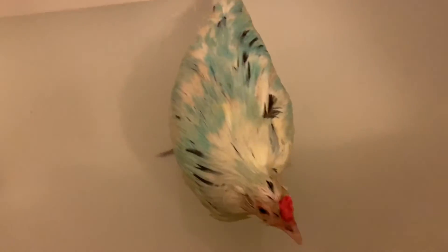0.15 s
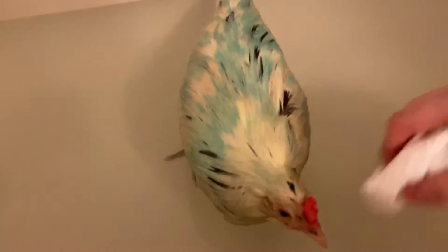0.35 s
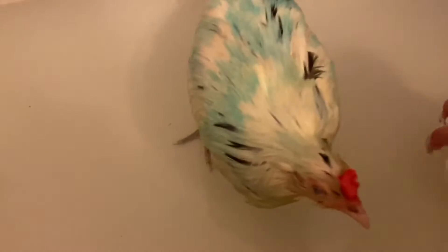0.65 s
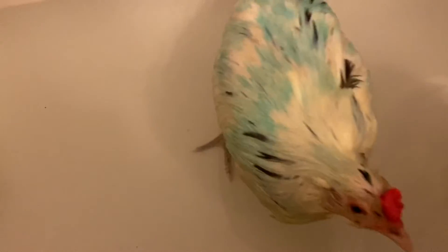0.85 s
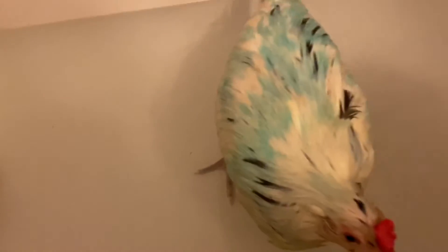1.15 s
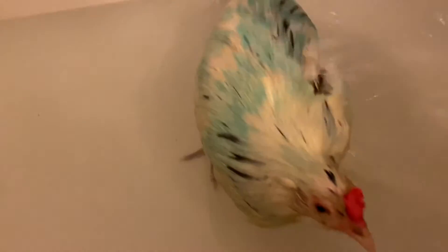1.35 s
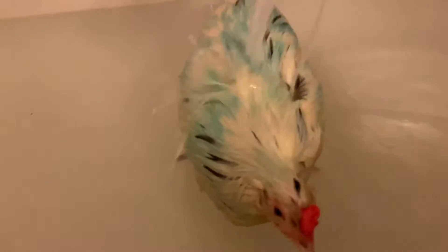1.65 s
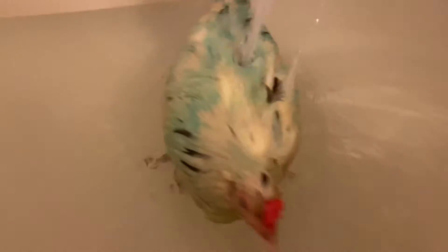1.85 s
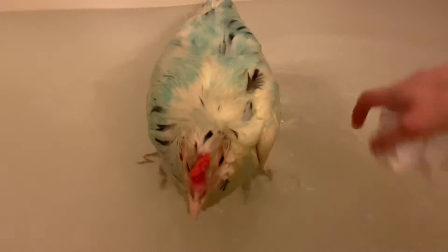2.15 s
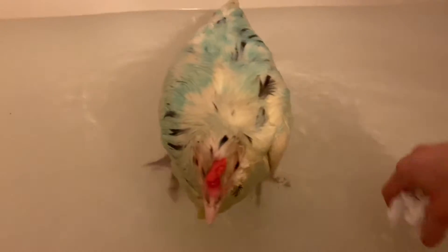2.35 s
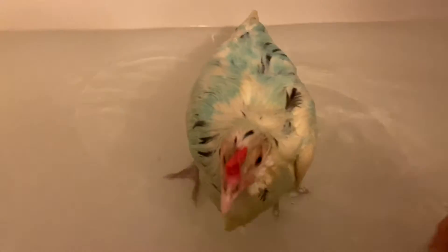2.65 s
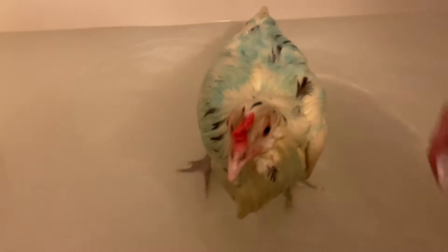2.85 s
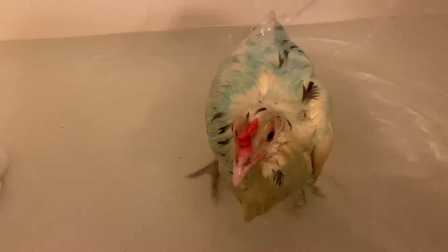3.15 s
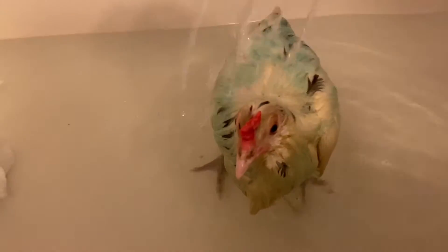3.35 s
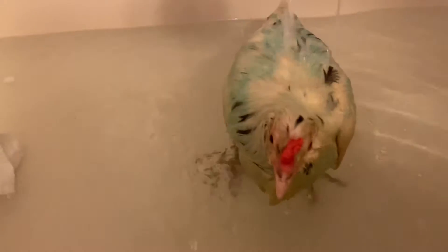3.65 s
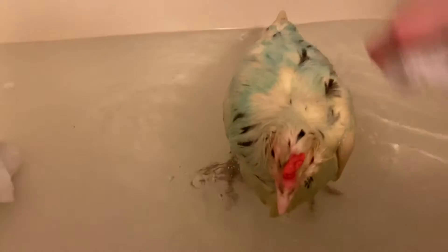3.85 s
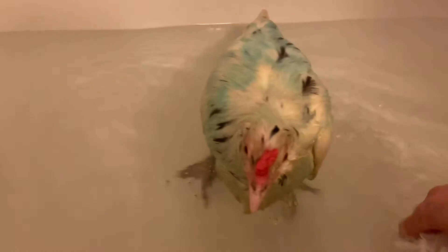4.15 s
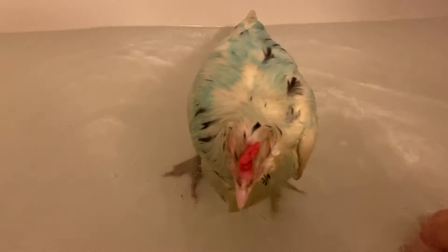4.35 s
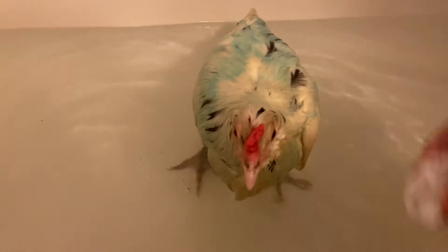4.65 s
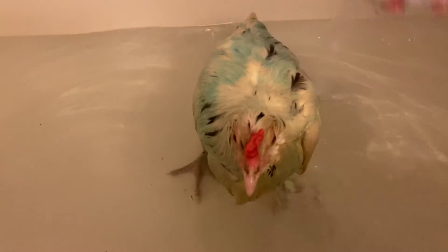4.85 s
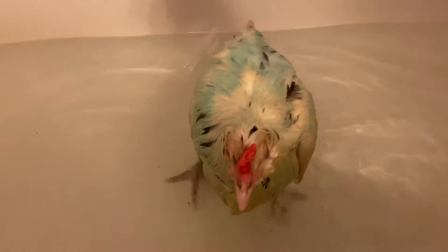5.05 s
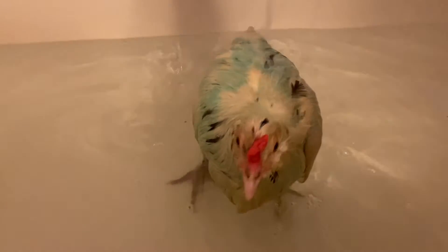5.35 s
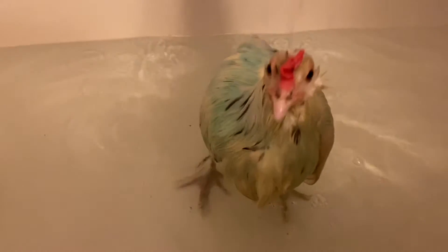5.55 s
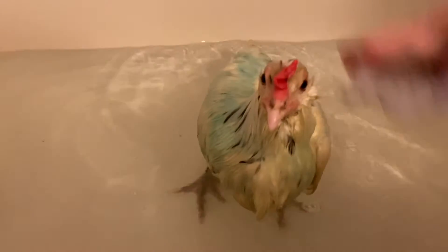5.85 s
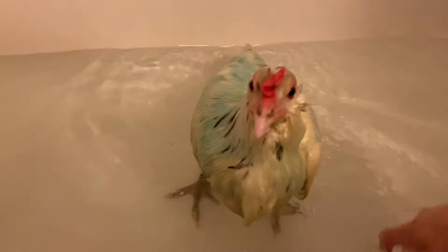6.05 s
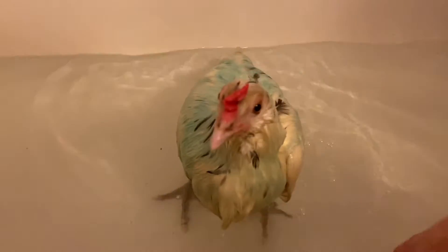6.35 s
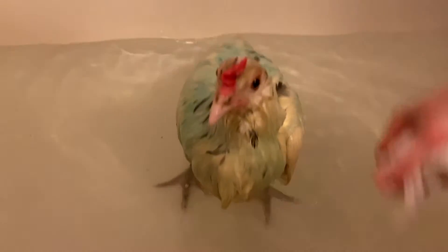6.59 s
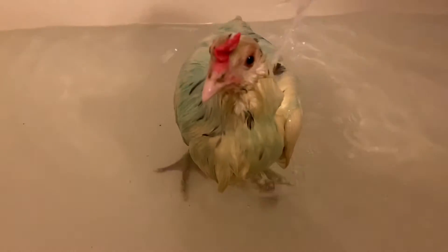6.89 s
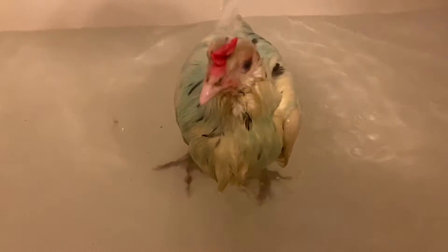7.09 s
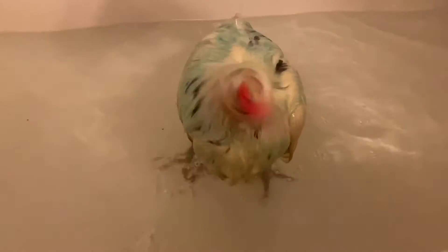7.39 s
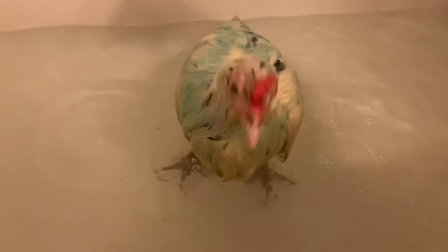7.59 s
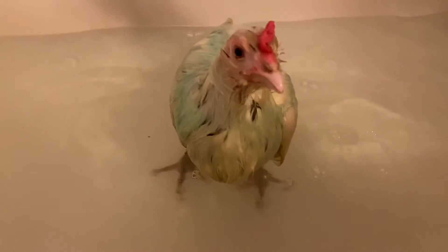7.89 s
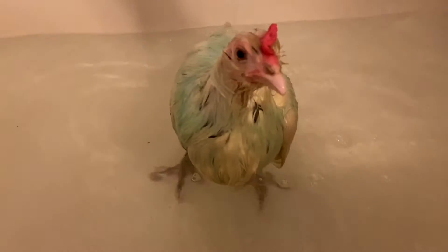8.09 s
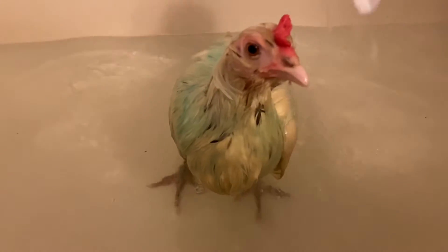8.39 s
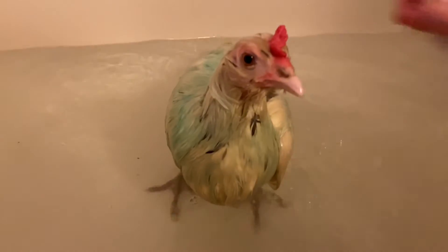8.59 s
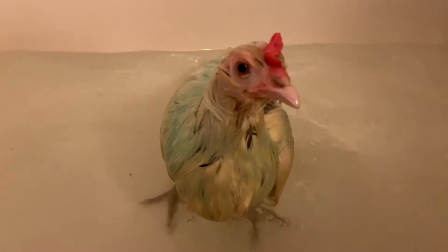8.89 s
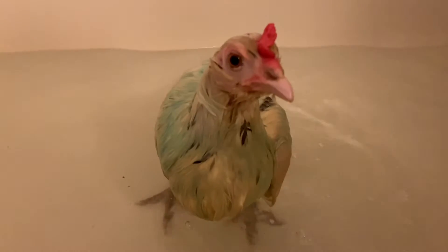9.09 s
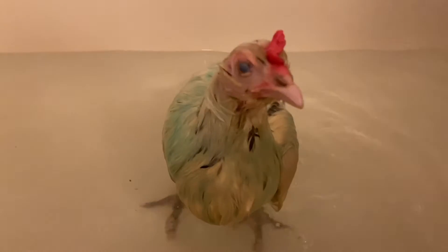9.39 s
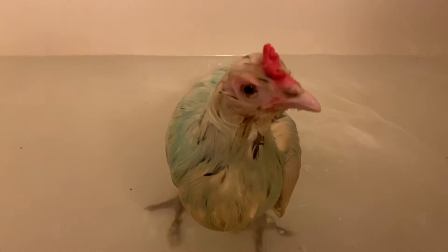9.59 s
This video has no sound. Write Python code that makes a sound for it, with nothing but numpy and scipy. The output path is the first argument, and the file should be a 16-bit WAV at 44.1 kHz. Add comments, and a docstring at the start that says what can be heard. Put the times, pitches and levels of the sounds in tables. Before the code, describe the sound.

A cloth is dipped and squeezed over shallow bathtub water, making small splashes, pinging drips and occasional low thumps.

```python
"""Wringing a cloth in the bathtub

A hand dips and wrings a cloth over shallow water in a small, hard-walled bathroom. Falling drops
trap bubbles that ping, glugs glide upward in pitch, and spray ticks and fizzes on the surface.
The tub booms when bumped and takes one small knock near the end. Underneath sit the low rumble of
the house, a faint hiss, two brief hums and a hollow, pipe-like rush that dies away early."""
import sys
import numpy as np
from scipy import signal
from scipy.fft import rfft, irfft, next_fast_len
from scipy.io import wavfile
from scipy.ndimage import uniform_filter1d

SR = 44100
rng = np.random.default_rng(int(sys.argv[2]) if len(sys.argv) > 2 else 0)


def to_wav(sig):
    """Store sig (one row per channel, or 1-D mono) as 16-bit WAV at the path in sys.argv[1].

    Samples outside -1..1 are clipped; the rate is SR.
    """
    pcm = np.clip(np.atleast_2d(sig), -1, 1) * 32767
    pcm = np.round(pcm).astype(np.int16)
    wavfile.write(sys.argv[1], SR, pcm.T)  # frames by channels


N = 429093

# Tone of the house rumble. Each row: frequency in Hz, level in dB.
RUMBLE_EQ = [(12, -40), (20, -23), (71, 8.5), (93, -5), (149, -14.5), (348, -17), (512, -27.5),
             (700, -25.5), (910, -56), (1540, -120)]
# Its fader. Each row: time in seconds, level in dB.
RUMBLE_FADER = [(0, -61), (.4, -70.5), (1, -58), (9.73, -58.5)]
# Resonances of the hollow rush. Each row: centre in Hz, width in Hz, level in dB.
PIPE_MODES = [(190, 130, 2.5), (514, 5, 5), (599.4, 16, 3), (744, 116, 0.5), (1007, 29, 3.5),
              (1540, 820, -7)]
# Its fader. Each row: time in seconds, level in dB.
PIPE_FADER = [(0, -63), (.8, -60.5), (1.3, -59), (1.75, -62), (2.05, -99)]
# Splashes and trickles. Each row: start and hold in seconds, spray and burble levels in dB.
SPLASH_CUES = [(0.124, 0.025, -69.5, -59.5), (0.682, 0.21, -76, -59.5), (0.895, 0.0039, -74, -45),
               (1.113, 0.045, -55, -49), (1.206, 0.12, -58.5, -52), (1.393, 0.039, -59.5, -55.5),
               (1.63, 0.2, -55, -57.5), (1.87, 0.048, -54, -51), (2.078, 0.025, -54.5, -94.5),
               (2.34, 0.17, -69, -63.5), (2.583, 0.058, -77, -54), (2.841, 0.12, -63.5, -57),
               (3.034, 0.24, -67.5, -57), (3.322, 0.01, -56, -57.5), (3.473, 0.19, -58.5, -61.5),
               (3.744, 0.025, -51, -52.5), (3.947, 0.15, -61.5, -61), (4.198, 0.033, -64.5, -51.5),
               (4.566, 0.12, -67, -49.5), (4.676, 0.16, -57, -71), (4.87, 0.073, -59, -55.5),
               (5.036, 0.33, -69, -64), (5.264, 0.069, -54, -57), (5.406, 0.14, -54.5, -51.5),
               (5.679, 0.046, -49, -47), (5.79, 0.066, -48, -35), (5.988, 0.22, -62.5, -55.5),
               (6.526, 0.19, -71, -61.5), (6.733, 0.14, -67.5, -58.5), (7.046, 0.11, -61, -58.5),
               (7.315, 0.017, -49.5, -71), (7.485, 0.074, -58, -51.5), (7.636, 0.012, -59, -50),
               (7.885, 0.16, -60, -64.5), (8.092, 0.19, -58.5, -90), (8.421, 0.053, -51.5, -51.5),
               (9.257, 0.032, -73.5, -74)]
# Faint high hiss and low water murmur between splashes.
# Each row: time in seconds, hiss and murmur levels in dB.
QUIET_BED = [(0, -71.5, -64.5), (.4, -77, -89), (2.75, -76, -66), (4.4, -76, -61), (6.4, -70.5, -71),
             (8.3, -70, -61), (8.8, -74, -77), (9.73, -86, -81)]
# Tone of the fine spray. Each row: frequency in Hz, level in dB.
SPRAY_EQ = [(1470, -15), (2500, -17.5), (2980, -3.5), (3520, -3.5), (5210, 1), (10700, -10), (12000, -42),
            (15600, -53), (22000, -120)]
# Tone of the churned water. Each row: frequency in Hz, level in dB.
BURBLE_EQ = [(180, -50.5), (300, 0.5), (535, -3), (1020, 1), (2470, -1), (4500, -13), (5850, -13.5),
             (9900, -120)]
# Drops that trap a bubble. Each row: start in seconds, level in dB, pitch in Hz.
PLINK_CUES = [(0.532, -44.5, 728), (0.719, -47.5, 1520), (1.067, -36, 2080), (1.113, -36, 1320),
              (1.124, -33, 1660), (1.137, -42.5, 1130), (1.15, -37, 1880), (1.337, -37, 1200),
              (1.713, -40.5, 2700), (2.121, -39, 1460), (2.261, -35.5, 1870), (2.276, -39, 2810),
              (2.286, -46.5, 1540), (2.442, -46, 1830), (2.455, -36.5, 1056), (2.471, -51, 614),
              (2.867, -36, 2040), (3.432, -33, 3200), (3.513, -37.5, 3170), (3.557, -38.5, 3930),
              (3.625, -45, 3150), (3.667, -46.5, 2260), (3.697, -43, 1520), (3.714, -41, 2560),
              (3.811, -44.5, 1950), (4.196, -43, 1200), (4.211, -39.5, 1690), (4.225, -42, 1850),
              (4.224, -43, 652), (4.485, -46.5, 1160), (4.502, -41, 2150), (4.583, -41.5, 1210),
              (4.617, -32.5, 1700), (4.629, -35.5, 1660), (4.688, -41.5, 1080), (4.692, -35, 2320),
              (4.71, -37, 1680), (4.726, -36.5, 2100), (4.777, -44, 1090), (4.808, -39, 1140),
              (4.821, -31.5, 1990), (4.835, -36, 2820), (5.412, -50, 1820), (5.455, -38, 1590),
              (5.673, -50, 1380), (5.721, -35.5, 1200), (5.738, -27, 1620), (5.749, -25.5, 2930),
              (6.041, -33.5, 1710), (6.162, -35.5, 1860), (6.166, -40.5, 1220), (6.246, -47, 1890),
              (6.515, -52.5, 1310), (6.738, -41.5, 3030), (6.877, -47, 1760), (7.113, -48, 1350),
              (7.247, -54, 3150), (7.333, -33, 1940), (7.335, -38, 2270), (7.347, -27, 2770),
              (7.349, -32, 2240), (7.362, -35, 2780), (7.625, -45, 2950), (8.451, -42, 980),
              (8.455, -34, 2100), (8.512, -34.5, 2820), (8.695, -54.5, 2420)]
# Fine droplets. Each row: start in seconds, level in dB.
TICK_CUES = [(0.659, -50), (1.54, -44.5), (1.615, -46), (1.703, -40), (1.8503, -35.5), (1.8986, -33.5),
             (2.071, -39.5), (2.225, -38), (2.393, -40), (3.959, -41), (5.091, -42.5), (5.2618, -36.5),
             (5.428, -39), (5.593, -38), (5.684, -32.5), (6.0414, -38.5), (6.814, -36.5), (7.3033, -37),
             (7.897, -44)]
# Drops that smack the surface. Each row: start in seconds, level in dB, centre in Hz.
SMACK_CUES = [(0.882, -42, 6700), (1.056, -44, 3600), (1.114, -40.5, 3400), (1.222, -32.5, 4930),
              (1.323, -42, 5050), (1.404, -43.5, 6150), (1.9238, -38.5, 6450), (2.075, -39.5, 4320),
              (2.181, -45, 4560), (2.521, -49, 5240), (2.898, -46.5, 3800), (2.919, -43, 5900),
              (3.0696, -41, 4600), (3.3297, -41, 5540), (3.5156, -42, 4670), (3.8356, -36.5, 6670),
              (4.022, -46.5, 4400), (4.7066, -37.5, 4400), (4.91, -42.5, 7300), (4.9448, -39, 3530),
              (5.0894, -43, 5060), (5.1134, -50, 5200), (5.175, -45.5, 5650), (5.2653, -36, 4770),
              (5.318, -37.5, 3370), (5.4256, -54, 3310), (5.454, -35, 2980), (5.638, -42, 4600),
              (5.655, -37, 4700), (5.7114, -36, 5130), (6.0415, -37, 5060), (6.6296, -46, 5660),
              (6.733, -42.5, 7100), (6.7766, -48, 3960), (6.8147, -41, 4230), (7.2464, -44.5, 5770),
              (7.312, -32.5, 4290), (7.648, -39, 4540), (7.684, -45, 4270), (7.8035, -47.5, 4780),
              (8.014, -45, 4080), (8.0923, -46, 5750), (8.19, -43, 5800), (8.232, -49.5, 5000),
              (8.371, -42, 6000), (8.3811, -40.5, 7200), (8.418, -23.5, 4940), (8.4951, -22, 5700)]
# Tub bumps. Each row: start in seconds, level in dB, seconds to fall 60 dB, relative thud level in dB.
BUMP_CUES = [(0.884, -25.5, 0.59, -10), (2.599, -31, 0.59, -6.5), (2.86, -53.5, 0.99, 4),
             (5.461, -50.5, 1, 4.5), (5.818, -36.5, 1, -1), (7.529, -38.5, 0.37, -1)]
# Modes of the tub floor. Each row: pitch in Hz, level in dB.
TUB_MODES = [(70, 6), (105, 1.5), (160, -2.5)]
# Gliding glugs and a few longer-ringing drip pings.
# Each row: start and length in seconds, first and last pitch in Hz, level and fall in dB.
GLUG_AND_PING_CUES = [(1.208, 0.01, 920, 950, -37.5, 18.5), (1.225, 0.0059, 1320, 1740, -38, 0),
                      (2.561, 0.022, 1362, 2520, -59, -8.5), (3.529, 0.013, 2360, 3370, -57.5, -4),
                      (3.537, 0.062, 579, 1165, -33, 22), (3.972, 0.065, 722, 1813, -37, 14),
                      (5.787, 0.019, 657, 825, -28.5, 16.5), (5.848, 0.02, 669, 816, -35.5, 4.5),
                      (6.801, 0.019, 866, 846, -36.5, 26), (8.904, 0.022, 2996, 3010, -62, 16)]
# Hollow hums. Each row: start and length in seconds, pitch in Hz, level in dB.
HUM_CUES = [(1.373, .19, 759, -62), (2.803, 0.21, 366, -64)]
# Flat slaps on the water. Each row: start in seconds, level in dB, centre in Hz.
SLAP_CUES = [(3.74, -27, 6000), (3.755, -33, 6000), (3.787, -31, 6500), (4.197, -31, 1500),
             (4.32, -35.5, 1960), (4.835, -31, 4000), (5.2, -27, 4660), (5.318, -35, 4000),
             (5.455, -39.5, 2540), (5.561, -50, 3500), (7.539, -30, 850), (8.962, -52, 1280),
             (8.995, -61, 1990), (9.352, -50, 425), (9.431, -52, 403)]
# Ring of the knocked object. Each row: pitch in Hz, level in dB, seconds to fall 60 dB.
KNOCK_MODES = [(1057, -51, 0.023), (2090, -33, 0.0067)]
# The tub's thump under the knock. Each row: time in seconds, pitch in Hz, level in dB.
THUMP_PATH = [(9.271, 191, -49), (9.286, 149, -46), (9.297, 92, -34.5), (9.324, 89, -66)]
# Bathroom reverb. Each row: frequency in Hz, seconds to fall 60 dB, level in dB.
REVERB_BANDS = [(500, 0.4, -6.5), (1020, 0.27, 0.5), (2930, 0.2, 0.5), (6160, 0.28, -1.5), (9900, 0.19, -6)]
# Stereo image of the noise beds. Each row: frequency in Hz, left-right likeness from 0 to 1.
STEREO_LIKENESS = [(60, 1), (300, 0.55), (1000, 0.25), (6000, 0.68), (9000, 0.3)]
# Phase lead of the left microphone port. Each row: frequency in Hz, phase in radians.
LEFT_PHASE = [(1700, 0.5), (3400, 1.52), (7300, 1.23), (8000, -3), (10400, -5.5), (12500, 24),
              (16000, -6.5)]

SIZE_LIMIT = .008  # caps the rare big bubbles and droplets; smaller lets them grow louder


def amp(db):
    """dB to gain."""
    return 10 ** (np.asarray(db) / 20)


def unit_rms(x):
    """Scales to rms 1."""
    return x / np.sqrt(np.mean(x ** 2) + 1e-20)


def at_hz(points, hz):
    """Reads (Hz, value) points on a log-frequency axis."""
    f, value = np.transpose(points)
    return np.interp(np.log(hz + 1), np.log(f + 1), value)


def fader(rows, column=1):
    """One column of a time table, at every sample."""
    columns = np.transpose(rows)
    return np.interp(np.arange(N) / SR, columns[0], columns[column])


def place(mix, start, sound, pan_db):
    """Drops a sound in at start seconds, leaning left by pan_db."""
    part = mix[:, round(start * SR):][:, :len(sound)]
    part += amp([[pan_db / 2], [-pan_db / 2]]) * sound[:part.shape[1]]


def equalise(x, eq):
    """Filters by a curve of (Hz, dB) points."""
    size = next_fast_len(x.shape[-1])
    return irfft(rfft(x, size) * amp(at_hz(eq, np.fft.rfftfreq(size, 1 / SR))), size)[..., :N]


def bandpass(x, low_hz, high_hz, order=2):
    """Keeps one band."""
    return signal.lfilter(*signal.butter(order, [low_hz, high_hz], "band", fs=SR), x)


def noise_bed(eq, patchy_db, frame):
    """Stereo noise with drifting louder and softer patches, partly alike left and right."""
    frames, hz = 4 * N // frame + 8, np.fft.rfftfreq(frame, 1 / SR)
    a, b, c, d, patches = rng.standard_normal((frames, len(hz), 5)).T
    right, unrelated = a + 1j * b, c + 1j * d
    patches = unit_rms(uniform_filter1d(uniform_filter1d(patches, size=6, axis=0), size=5, axis=1))
    alike = np.clip(at_hz(STEREO_LIKENESS, hz), 0, 1)[:, None]
    lead = np.exp(1j * at_hz(LEFT_PHASE, hz))[:, None]
    spectra = np.array([lead * alike * right + np.sqrt(1 - alike ** 2) * unrelated, right])
    spectra *= amp(at_hz(eq, hz)[:, None] + patchy_db * patches)
    return unit_rms(signal.istft(spectra, nperseg=frame, noverlap=frame * 3 // 4)[1][:, :N])


def house_rumble():
    """The low bed of the house, leaning slightly right."""
    return noise_bed(RUMBLE_EQ, patchy_db=2.93, frame=2048) * amp(fader(RUMBLE_FADER) + [[-.9], [.9]])


def pipe_rush():
    """Noise through the resonances of a hollow pipe, fading out early."""
    hz = np.geomspace(60, 6000, 600)
    power = sum(amp(2 * db) / (1 + (2 * (hz - f) / width) ** 2) ** 2 for f, width, db in PIPE_MODES)
    eq = np.transpose([hz, 10 * np.log10(power)])
    return noise_bed(eq, patchy_db=2.5, frame=2048) * amp(fader(PIPE_FADER))


def splash_level(column, fall_db_per_s, swell_db_per_s=598):
    """Splashes swell, hold and die over the quiet bed, in dB; column 1 is spray, 2 is burble."""
    t = np.arange(0, N, 64) / SR
    power = 0
    for start, hold, *levels in SPLASH_CUES:
        attack_db = swell_db_per_s * np.maximum(start - t, 0)
        release_db = fall_db_per_s * np.maximum(t - start - hold, 0)
        power += amp(2 * (levels[column - 1] - attack_db - release_db))
    return 10 * np.log10(np.interp(np.arange(N) / SR, t, power) + amp(2 * fader(QUIET_BED, column)))


def bubble(hz, cycles, rise):
    """A trapped bubble rings as a sine that climbs a little and fades by 1/e over the given cycles."""
    turns = np.arange(round(SR * 6 * cycles / hz)) * hz / SR
    envelope = np.exp(-turns / cycles) * (1 - np.exp(-turns / 0.65))
    return envelope * np.sin(2 * np.pi * turns * (1 + rise * turns / cycles))


def tiny_bubbles(low_hz, high_hz, per_s, spread_db, pitches):
    """A cloud of bubbles at random moments, a few much louder than the rest."""
    out = np.zeros((2, N))
    for hz in np.geomspace(low_hz, high_hz, pitches):
        chance, rank, side = rng.random((3, N))
        left = .3 + .4 * side
        pops = (chance < per_s / pitches / SR) * amp(-spread_db * np.log(rank + SIZE_LIMIT))
        ping = bubble(hz, cycles=2.5, rise=0.045)
        out += signal.oaconvolve([pops * left, pops * (1 - left)], ping[None], axes=1)[:, :N]
    return out


def patter(share, per_s=45, fade_s=0.025, spread_db=6.5):
    """Flutter on the spray's gain: droplets land and die away, carrying a share of its power."""
    chance, rank = rng.random((2, N))
    landings = (chance < per_s / SR) * amp(-2 * spread_db * np.log(rank + SIZE_LIMIT))
    power = signal.lfilter([1], [1, -np.exp(-1 / (fade_s * SR))], landings)
    return np.sqrt(1 - share + share * power / uniform_filter1d(power, size=SR // 4))


def spray():
    """Two layers: close grains of fizz and crackle, and a hiss already spread by the tub."""
    fizz = tiny_bubbles(2500, 11000, per_s=700, spread_db=5.5, pitches=30)
    fizz = unit_rms(equalise(fizz, SPRAY_EQ))
    crackle = unit_rms(tiny_bubbles(7000, 14000, per_s=200, spread_db=5, pitches=10))
    level_db = splash_level(column=1, fall_db_per_s=128)
    busy = np.minimum(amp(level_db + 64), 1)  # calm water barely crackles
    grains = (fizz + crackle) * amp(level_db - 5) * busy
    hiss = noise_bed(SPRAY_EQ, patchy_db=3.5, frame=256) * patter(.85 * busy)
    lows = signal.filtfilt(*signal.butter(3, 4600, fs=SR), hiss)
    hiss += lows * (amp(0.34 * (level_db + 44)) - 1)  # in quiet moments only a thin, high hiss remains
    return grains, hiss * amp(level_db)


def burble():
    """The body of churned water: a heavy slosh is dense and even, a light one patchy."""
    gain = amp(splash_level(column=2, fall_db_per_s=117))
    weight = gain / (gain + amp(-37))
    light = noise_bed(BURBLE_EQ, patchy_db=3.5, frame=512)
    heavy = noise_bed(BURBLE_EQ, patchy_db=2.5, frame=256)
    return amp(-6) * gain * (np.sqrt(1 - weight) * light + np.sqrt(weight) * heavy)


def impact(hz, band, fade_s):
    """A drop hits the water: a noise burst between two multiples of hz, peak 1."""
    age = np.arange(900) / SR / fade_s
    noise = rng.standard_normal(len(age)) * (age + 0.041) * np.exp(-age)
    burst = bandpass(noise, hz * band[0], hz * band[1], order=3)
    return burst / abs(burst).max()


def plinks():
    """Drops land softly and trap a bubble that pings."""
    out = np.zeros((2, N))
    for start, db, hz in PLINK_CUES:
        cycles = 4.76 + 0.5 * np.log2(hz / 1e3)  # small bubbles ring a few more cycles
        place(out, start, amp(db) * bubble(hz, cycles, rise=0.024), pan_db=6)
        place(out, start, amp(db - 14) * impact(hz, band=(0.85, 1.4), fade_s=0.003), pan_db=3)
    return out


def ticks():
    """Droplets so fine that they only tick."""
    out = np.zeros((2, N))
    for start, db in TICK_CUES:
        place(out, start, amp(db) * impact(12500, band=(0.59, 1.07), fade_s=0.0014), pan_db=-0.5)
    return out


def smacks():
    """Drops hit hard: a sharp impact with a small, bright bubble."""
    out = np.zeros((2, N))
    for start, db, hz in SMACK_CUES:
        place(out, start, amp(db) * impact(hz, band=(0.67, 1.38), fade_s=0.0013), pan_db=3)
        place(out, start, amp(db - 1) * bubble(hz, cycles=8.8, rise=0.021), pan_db=8.5)
    return out


def tub_bumps():
    """Each bump shakes the tub floor: its modes bloom and die along with a dull thud."""
    out, t = np.zeros((2, N)), np.arange(SR // 2) / SR
    for start, db, t60, thud_db in BUMP_CUES:
        noise = rng.standard_normal(len(t))
        ring = sum(amp(mode_db) * np.sin(2 * np.pi * hz * t + phase)
                   for (hz, mode_db), phase in zip(TUB_MODES, noise))
        thud = amp(thud_db) * unit_rms(bandpass(noise, 125, 300))
        envelope = amp(db - 14.5 - 60 * t / t60) * (1 - np.exp(-t / 0.016))
        place(out, start, envelope * (ring + thud), pan_db=-4)
    return out


def glide(times, hz, db):
    """A soft-edged sine along a path of pitches and levels."""
    t = np.arange(times[0], times[-1], 1 / SR)
    tone = np.sin(2 * np.pi * np.cumsum(np.interp(t, times, hz)) / SR)
    return amp(np.interp(t, times, db)) * tone * signal.windows.tukey(len(t), .12)


def glugs_and_pings():
    """Glugs rest in pitch, then climb ever faster; a few longer-ringing drip pings barely bend."""
    out, progress = np.zeros((2, N)), np.linspace(0, 1, 12)
    for start, length, first_hz, last_hz, db, fall_db in GLUG_AND_PING_CUES:
        hz = first_hz + (last_hz - first_hz) * progress ** 2.2
        place(out, start, glide(start + length * progress, hz, db - fall_db * progress), pan_db=-3)
    return out


def hums():
    """Hollow hums: narrow bands of noise under a soft swell."""
    out = np.zeros((2, N))
    for start, length, hz, db in HUM_CUES:
        band = bandpass(rng.standard_normal(SR), hz - 13, hz + 13)
        hum = unit_rms(band[-round(length * SR):])
        place(out, start, amp(db) * hum * signal.windows.tukey(len(hum), .6), pan_db=0)
    return out


def slaps():
    """Flat slaps on the surface, one broad click each."""
    out = np.zeros((2, N))
    for start, db, hz in SLAP_CUES:
        turns = np.arange(600) * hz / SR
        envelope = np.exp(-turns / 0.98) * np.minimum(turns / 0.15, 1)
        place(out, start, amp(db) * envelope * np.cos(2 * np.pi * turns), pan_db=-1)
    return out


def knock(start=9.281):
    """One small, hard knock: two short modes ring far to the left."""
    out, t = np.zeros((2, N)), np.arange(6000) / SR
    ring = sum(amp(db - 60 * t / t60) * np.sin(2 * np.pi * hz * t) for hz, db, t60 in KNOCK_MODES)
    place(out, start, ring * (1 - np.exp(-t / 0.0021)), pan_db=25)
    return out


def tub_thump():
    """The tub's low thump under the knock, falling in pitch."""
    out = np.zeros((2, N))
    times, hz, db = np.transpose(THUMP_PATH)
    place(out, times[0], glide(times, hz, db), pan_db=-6.5)
    return out


def bathroom(x):
    """Hard-wall reverb: sparse echoes of random sign, each band with its own level and decay."""
    size = SR // 2
    taps = np.zeros((2, size))
    arrivals = np.arange(120, size - 20, 20) + rng.integers(0, 20, (2, (size - 121) // 20))
    np.put_along_axis(taps, arrivals, rng.choice([-1., 1.], arrivals.shape), 1)
    taps[0] += 0.17 * taps[1]  # the microphone ports are close, so they share some echoes
    taps *= 1 - np.exp(-np.arange(size) / SR / 0.001)  # echoes build over the first bounces
    hz, t, spectra = signal.stft(taps, SR, nperseg=256)
    bands = np.array(REVERB_BANDS)
    t60 = at_hz(bands[:, :2], hz)[:, None]
    tail = signal.istft(spectra * amp(-60 * t / t60), SR, nperseg=256)[1]
    tail /= np.linalg.norm(tail, axis=1, keepdims=True)
    wet = signal.fftconvolve(x.mean(0)[None], tail, axes=1)[:, :N]
    return equalise(wet, bands[:, ::2])


def scene():
    """The mix: close water and the knock feed the reverb; beds, tub and hums bypass it."""
    grains, hiss = spray()
    slosh = burble()
    close = grains + plinks() + smacks() + ticks() + glugs_and_pings() + slaps() + knock()
    lead = np.exp(1j * at_hz(LEFT_PHASE, np.fft.rfftfreq(N, 1 / SR)))
    direct = np.array([irfft(rfft(close[0]) * lead, N), close[1]])
    foreground = direct + bathroom(close) + hiss + slosh
    return foreground + house_rumble() + tub_bumps() + tub_thump() + pipe_rush() + hums()


def record(dry, cutoff_hz=15850):
    """The microphone lifts all but the top octave, which it dulls; then a steep low-pass."""
    dull = equalise(dry, [(7000, 3), (9000, 3), (11500, 0), (13200, -36.5), (15000, -7.5)])
    lowpass = signal.firwin(511, cutoff_hz, window=("kaiser", 9), fs=SR)
    return signal.oaconvolve(dull, lowpass[None], "same")


dry = scene()
out = record(dry)
to_wav(out)
```